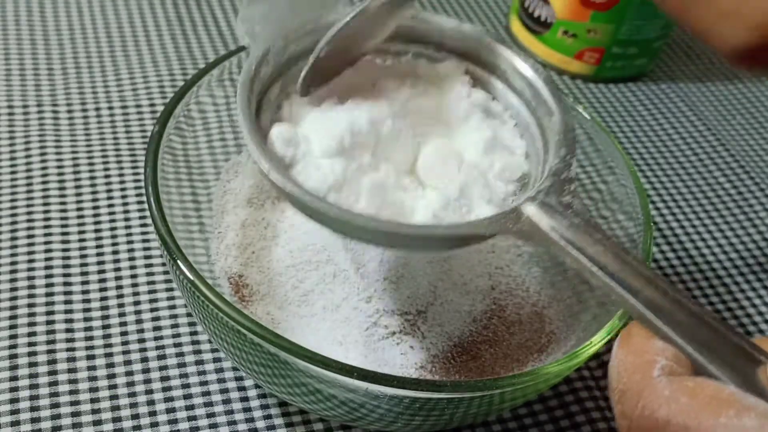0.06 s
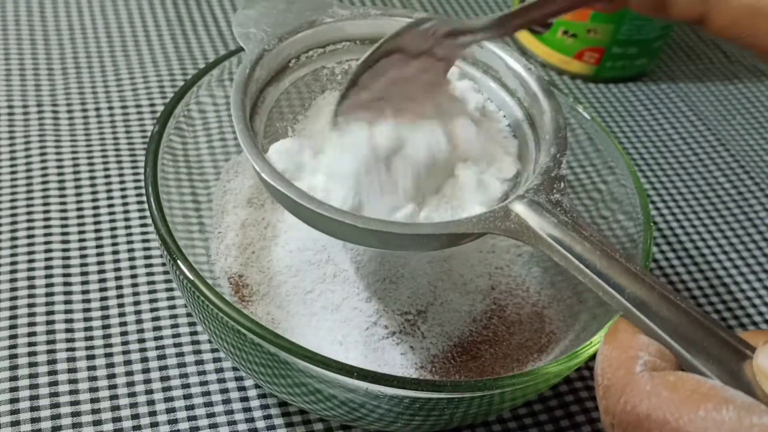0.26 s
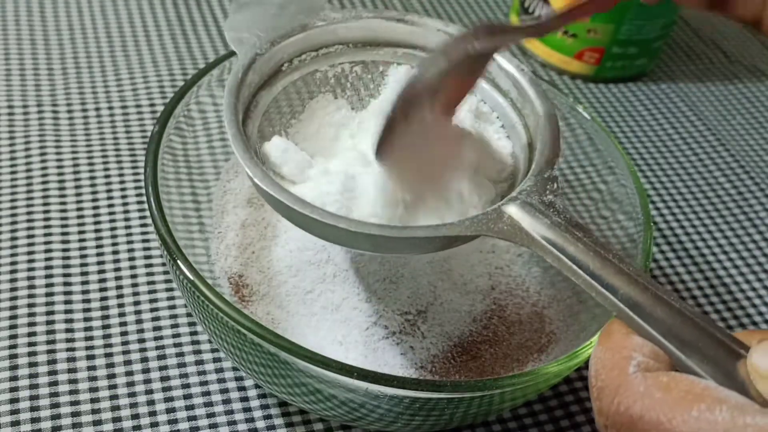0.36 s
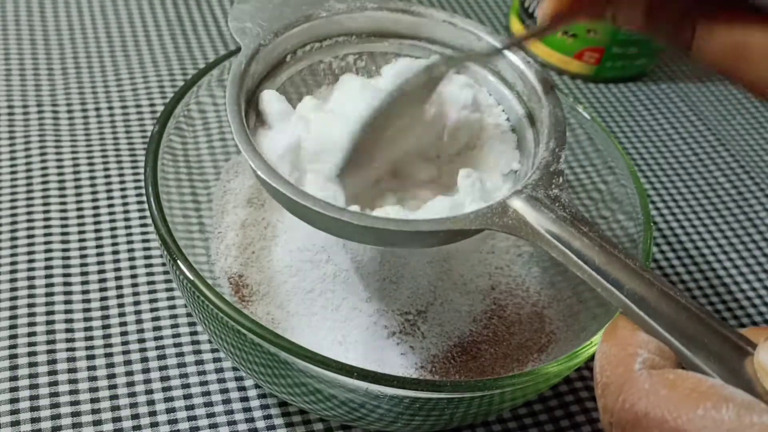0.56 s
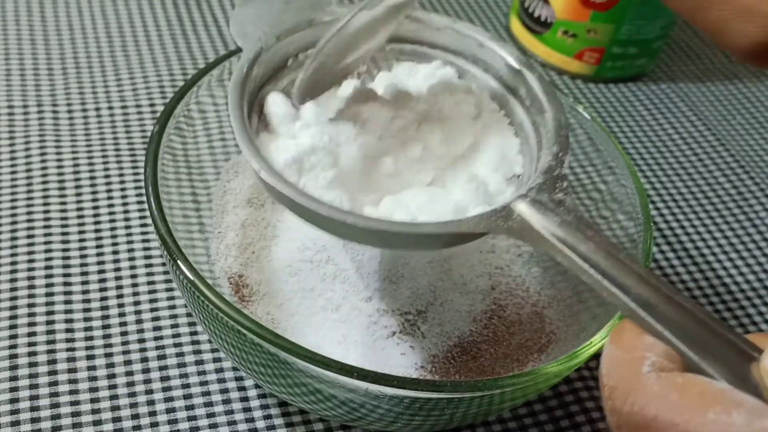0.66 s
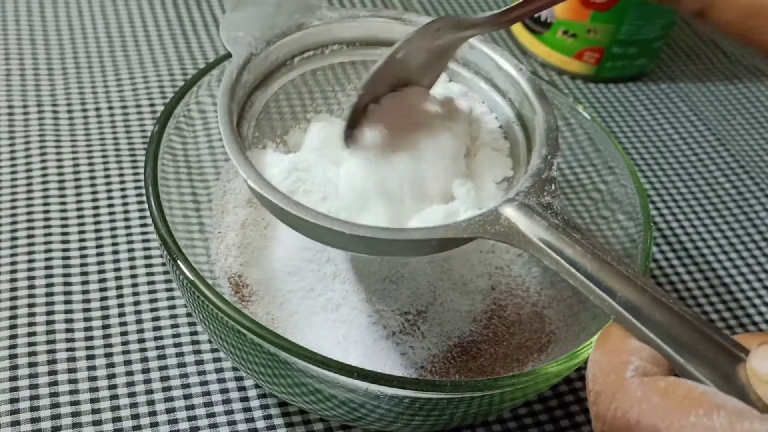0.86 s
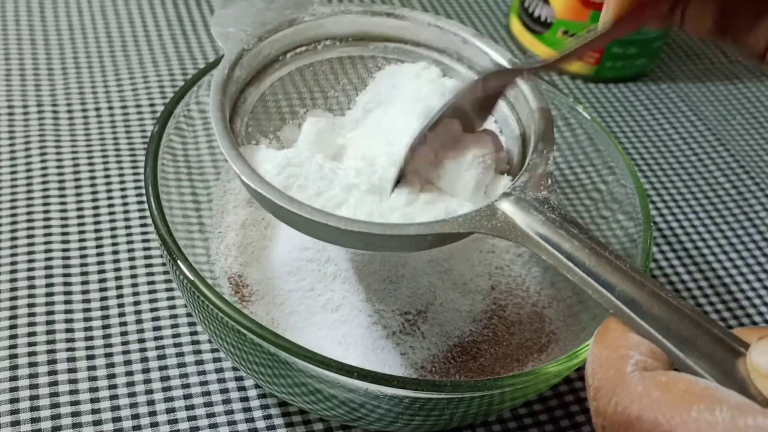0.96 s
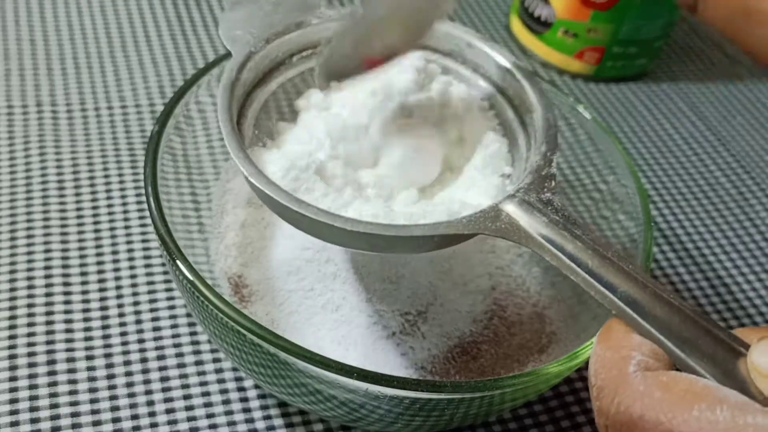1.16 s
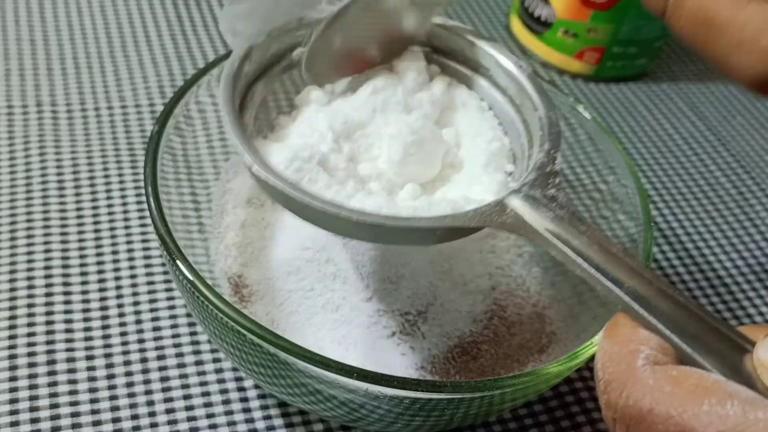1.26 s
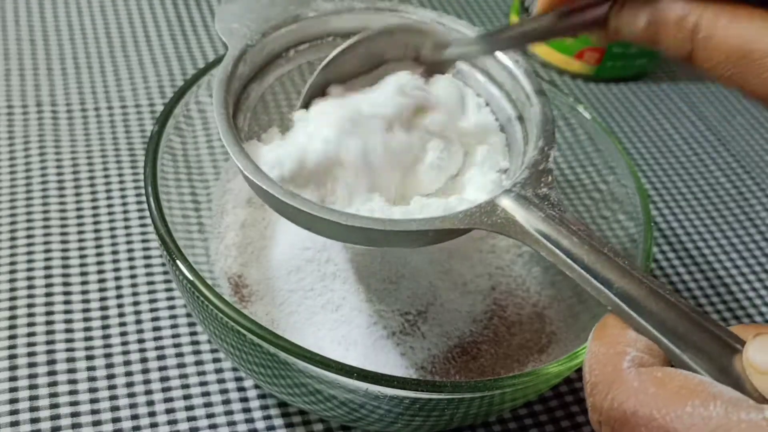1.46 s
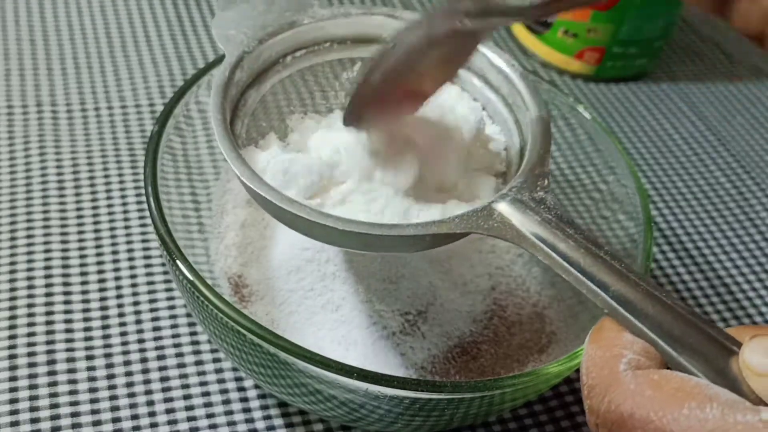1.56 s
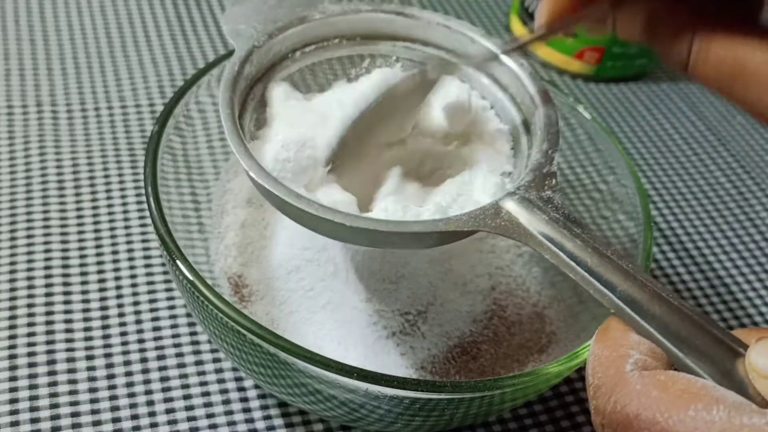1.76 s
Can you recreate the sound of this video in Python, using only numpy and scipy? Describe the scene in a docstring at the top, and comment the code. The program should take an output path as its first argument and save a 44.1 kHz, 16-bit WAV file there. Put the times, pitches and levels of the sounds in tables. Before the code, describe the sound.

A metal spoon scrapes powdered sugar through a wire sieve in short, harsh, uneven rasping strokes

```python
"""A steel spoon pushes powdered sugar through a wire sieve over a glass bowl in a quiet kitchen.
Random clicks make the rasp over the mesh and short noise bursts its catches; both ring through the sieve.
Shaped clicks make the crunch of packed sugar and the trickle of loose powder. Filtered noise makes the
shudder, the drumming mesh, the faint rim squeaks and the room tone; short sine pings are the knocks."""
import sys
import numpy as np
from scipy import signal
from scipy.fft import rfft, irfft
from scipy.io import wavfile

SR = 44100
rng = np.random.default_rng(int(sys.argv[2]) if len(sys.argv) > 2 else 0)


def dump(signal):
    """Clip the signal to [-1, 1] and save it as 16-bit WAV at the path in sys.argv[1]."""
    limited = np.clip(np.atleast_2d(signal).T, -1, 1)
    pcm = np.round(limited * 32767).astype(np.int16)
    wavfile.write(sys.argv[1], SR, pcm)


N = 79380  # length in samples, 1.8 s
TIME = np.arange(N) / SR  # seconds


def from_db(db):
    """Turn decibels into a gain."""
    return 10 ** (np.asarray(db) / 20)


def rms_one(x):
    """Scale a sound to an rms (average strength) of 1."""
    return x / np.sqrt(np.mean(x ** 2) + 1e-20)


def colour(x, points):
    """Give a sound the drawn spectrum shape without sounding ahead of time; white noise keeps its power."""
    size = 2 * N
    hz, db = np.transpose(points)
    bin_hz = np.arange(N + 1) * SR / size
    curve_db = np.interp(np.log(bin_hz + 1), np.log(hz), db)
    gain = rms_one(from_db(curve_db))
    # Folding the cepstrum makes the filter react only after its input (minimum phase).
    cepstrum = irfft(np.log(gain))
    cepstrum[1:N] *= 2
    cepstrum[N + 1:] = 0
    response = np.exp(rfft(cepstrum))
    return irfft(rfft(x, size) * response)[:N]


def resonance(x, hz, width_hz):
    """Let one pitch ring: a two-pole band-pass with gain 1 at its peak; a narrow one rings longer."""
    r = np.exp(-np.pi * width_hz / SR)
    top = np.array([1, 0, -1]) * (1 - r * r) / 2
    bottom = [1, -2 * r * np.cos(2 * np.pi * hz / SR), r * r]
    return signal.lfilter(top, bottom, x + 1e-18)


def ringing_noise(noise, hz, width_hz):
    """Noise passed twice through one resonance: a wavering tone with rms 1."""
    once = resonance(noise, hz, width_hz)
    return rms_one(resonance(once, hz, width_hz))


def drift(rate):
    """Random wander with rms 1, joining 2 * rate random points per second by straight lines."""
    points = rng.standard_normal(N)
    return rms_one(np.interp(TIME * rate * 2, np.arange(N), points))


def grains(per_s, spread_db):
    """Random clicks of uneven size and either sign, rms 1."""
    size_db = spread_db * np.minimum(rng.exponential(1, N), 4)
    sizes = from_db(size_db) * rng.choice([-1, 1], N)
    return rms_one(sizes * (rng.random(N) < per_s / SR))


def swells(rows):
    """Sum of bell-shaped rises and falls; half is the bell's standard deviation in seconds."""
    return sum(from_db(db) * np.exp(-.5 * ((TIME - s) / half) ** 2) for s, db, half in rows)


def stroke_gain(axis):
    """Strength of all strokes over time, read from one table column."""
    # one list per stroke, points joined by straight lines in dB: time_s, rasp_db, crunch_db
    # (both levels before small fixed boosts and filters)
    stroke_curves = [
        [(0, -60.5, -65), (.055, -58.5, -67), (.075, -84, -99), (.1, -88, -88)],
        [(.208, -66, -89), (.214, -54.5, -68), (.26, -44, -51.5), (.275, -35.5, -62), (.305, -40, -45.5),
         (.335, -47.5, -52.5), (.375, -81, -73.5)],
        [(.56, -65.5, -83), (.59, -58, -83), (.605, -45.5, -64), (.64, -39, -56.5), (.682, -50.5, -53),
         (.695, -68.5, -63.5), (.76, -74, -76), (.79, -90, -88)],
        [(.848, -78.5, -78), (.853, -55, -64), (.868, -55, -67.5), (.876, -37.5, -51.5), (.925, -39, -43),
         (.94, -46.5, -54.5), (.968, -52.5, -57.5), (.985, -67, -66), (1.02, -70, -71), (1.1, -74, -72),
         (1.19, -80, -78)],
        [(1.2, -43, -75), (1.21, -42, -57), (1.237, -42.5, -63), (1.246, -52, -57.5), (1.31, -64.5, -66),
         (1.33, -74, -88)],
        [(1.416, -45, -47.5), (1.45, -40.5, -56), (1.464, -50, -54), (1.5, -37, -50), (1.542, -41, -52.5),
         (1.55, -71, -52.5), (1.57, -67, -57.5), (1.585, -84, -86)],
        [(1.785, -74, -77), (1.793, -57, -77), (1.8, -44.5, -74)],
    ]
    total = 0
    for rows in stroke_curves:
        points = np.array(rows)
        level_db = np.interp(TIME, points[:, 0], points[:, axis], left=-120, right=-120)
        total = total + from_db(level_db)
    return total


def background():
    """Low room tone from coloured noise, with a faint wavering hum from narrow resonances."""
    # faint hum tones: pitch_hz, level_db
    hum_tones = [(338, -77.5), (415, -83)]
    # spectrum shape of the room tone: pitch_hz, relative_db_per_hz
    room_tone_shape = [(25, -16.5), (45, -7), (100, 2), (165, 1), (225, -4.5), (340, -2), (430, -3),
                       (490, -7.5), (610, -6), (900, -17.5), (3000, -22.5), (8000, -27.5), (15000, -32.5)]
    width_hz, room_tone_db = 5.6, -70
    hum = sum(from_db(db) * ringing_noise(rng.standard_normal(N), hz, width_hz) for hz, db in hum_tones)
    return hum + from_db(room_tone_db) * colour(rng.standard_normal(N), room_tone_shape)


def kitchen(x):
    """Sound scattered by the room: a short tail of fading noise."""
    t60_s, tail_db = 0.16, -16  # t60: time to fall by 60 dB
    tail = rng.standard_normal(N) * from_db(-60 * TIME / t60_s) * (TIME > .004)
    tail = tail / np.sqrt(np.sum(tail ** 2))
    return from_db(tail_db) * signal.fftconvolve(x, tail)[:N]


def rim_squeaks():
    """The spoon rubs on the rim: friction noise excites a faint, wavering pitch."""
    # rubs on the rim: middle_s, level_db, half_length_s, pitch_hz
    rim_rubs = [(0.83, -73, 0.0089, 2910), (0.846, -74, .005, 3550), (.975, -62, .004, 2700),
                (1.04, -67, .045, 2980), (1.183, -74.5, 0.041, 2860), (1.321, -68, .005, 2970),
                (1.342, -76, 0.044, 2910)]
    width_hz = 340
    friction = rng.standard_normal(N)
    return sum(swells([(s, db, half)]) * ringing_noise(friction, hz, width_hz)
               for s, db, half, hz in rim_rubs)


def knocks():
    """The spoon's edge strikes bare steel: sine pings with a soft start that die away quickly."""
    # knocks: start_s, level_db (before the soft start), pitch_hz, t60_s (time to fall by 60 dB)
    steel_knocks = [(0.6317, -9, 2200, 0.0014), (1.2015, -11.5, 5400, .004), (1.4164, -25.5, 3027, 0.016),
                    (1.4843, -21, 7400, 0.0064), (1.708, -57.5, 7490, 0.028)]
    rise_s = 0.00047
    out = np.zeros(N)
    for s, db, hz, t60 in steel_knocks:
        age = np.maximum(TIME - s, 0)
        decay = from_db(db - 60 * np.minimum(age / t60, 2))
        rise = 1 - np.exp(-age / rise_s)
        out += decay * rise * np.sin(2 * np.pi * hz * age)
    return out


def shudder():
    """Each push shakes the sieve: low coloured noise swells and fades."""
    # pushes: middle_s, level_db, half_length_s
    push_swells = [(.02, -63, 0.04), (.25, -62, 0.017), (.32, -56, 0.032), (.645, -57.5, .04),
                   (.955, -58, 0.027), (1.27, -65, 0.027), (1.52, -56.5, 0.042)]
    # spectrum shape of the shaking: pitch_hz, relative_db_per_hz
    shaking_shape = [(25, -29), (45, -12.5), (65, -2), (100, -1.5), (160, -1), (260, -7), (500, -26)]
    return swells(push_swells) * colour(rng.standard_normal(N), shaking_shape)


def dome():
    """The stretched mesh drums under a hard push: noise rings at one low pitch."""
    # drumming: middle_s, level_db, half_length_s
    drum_swells = [(.302, -50.5, 0.022), (.928, -49, 0.0087), (.95, -63, 0.018)]
    return swells(drum_swells) * ringing_noise(rng.standard_normal(N), hz=688, width_hz=90)


def trickle():
    """Loose powder falls through the mesh: a dense rain of tiny, uneven clicks."""
    # trickles: middle_s, level_db, half_length_s
    trickle_swells = [(.45, -70, 0.055), (.74, -77.5, 0.033), (1.085, -63, 0.025), (1.145, -58, .016),
                      (1.185, -55, 0.011), (1.67, -73.5, 0.045)]
    # spectrum shape of the powder: pitch_hz, relative_db_per_hz
    powder_shape = [(800, -10.5), (2000, -9), (4600, -6), (6500, -6.5), (8100, 1.5), (9400, -5),
                    (10600, -12), (12400, -10), (13600, 1), (14500, -4.5), (15400, -6.5)]
    return swells(trickle_swells) * colour(grains(per_s=34000, spread_db=8.0), powder_shape)


def crunch():
    """Packed sugar breaks under the spoon: random crumb clicks with a dull colour."""
    # spectrum shape of the crunch: pitch_hz, relative_db_per_hz
    crunch_shape = [(100, -12), (200, -11.5), (330, 0.5), (480, -6.5), (690, -2.5), (840, -13.5),
                    (1500, -12), (3000, -16)]
    boost_db = 1
    crumbs = colour(grains(per_s=2000, spread_db=1.5), crunch_shape)
    return from_db(boost_db) * stroke_gain(axis=2) * crumbs


def catches():
    """The spoon snags and lets go: a sudden burst of wire chatter rings and dies in milliseconds."""
    # catches: start_s, level_db (before trim_db and the sieve), hold_s (before the decay),
    # ring_hz (of that spot), ring_boost_db, boost_above_11_khz_db
    mesh_catches = [(0.2308, -43, .001, 8300, 15, 8), (0.2405, -44, 0.0024, 8200, 5, 0),
                    (.2652, -31.5, .0035, 2900, 3.5, -13), (.2688, -35, 0.0018, 8100, 7, -3),
                    (0.2853, -30, 0.0028, 8230, 7, 7), (.291, -30, 0.0033, 8160, 11.5, -17),
                    (0.603, -44.5, 0.0017, 7460, 8, 16.5), (0.622, -28, 0.0038, 7100, 2, -4),
                    (0.6311, -26, 0.0032, 3150, 5, 2.5), (0.6502, -32, 0.0014, 7600, -7, -17),
                    (0.8707, -30, 0.0068, 3420, -0.5, 6), (0.886, -35.5, 0.0027, 2530, 8.5, 5),
                    (0.904, -36, 0.0044, 8100, 7.5, 8), (0.9243, -33.5, 0.0042, 8400, 9, 8),
                    (1.2013, -24, 0.0024, 4730, 8, -2.5), (1.4161, -29, 0.0032, 8200, 3, -0.5),
                    (1.45, -38.5, 0.0012, 7730, 12.5, 0), (1.483, -26.5, 0.0014, 4000, 1, -10),
                    (1.4967, -35, 0.0026, 8100, 1, 4), (1.531, -30.5, 0.0017, 6270, 6, -15),
                    (1.5361, -30, 0.0028, 8200, 5, -11), (1.544, -34.5, 0.00093, 7860, 10, -8),
                    (1.71, -58, 0.0012, 11500, 10, 6)]
    decay_s, trim_db, tremble_db = 0.0013, -1, 2.5
    ring_width_hz = 830
    chatter = rng.choice([-1., 1.], N) * from_db(trim_db + tremble_db * drift(700))
    high_pass = signal.butter(3, 11000, "high", fs=SR, output="sos")
    high = signal.sosfiltfilt(high_pass, chatter)
    out = np.zeros(N)
    for s, db, hold, ring_hz, ring_db, high_db in mesh_catches:
        fade = np.exp(-np.maximum(TIME - s - hold, 0) / decay_s)
        envelope = from_db(db) * (TIME >= s) * fade
        burst = envelope * (chatter + (from_db(high_db) - 1) * high)
        out += burst + (from_db(ring_db) - 1) * resonance(burst, ring_hz, ring_width_hz)
    return out


def rasp():
    """Thousands of tiny slips over the wires, in an uneven judder, coloured by where the spoon presses."""
    # favoured parts of the mesh: middle_s, half_length_s, pitch_hz, width_hz, added_level_db
    mesh_spots = [(.29, 0.037, 2460, 700, -8), (0.64, 0.037, 4950, 3500, -10),
                  (.9, 0.031, 2140, 1000, -0.5), (.9, .04, 14700, 2000, -3), (1.25, 0.17, 4380, 2500, 0.5),
                  (1.52, 0.028, 7200, 1300, -4), (1.8, .03, 13900, 3060, 9.5)]
    boost_db, judder_db, judder_per_s = 0.5, 2, 170
    judder = from_db(boost_db + judder_db * drift(judder_per_s))
    slips = stroke_gain(axis=1) * judder * grains(per_s=9000, spread_db=2.5)
    spots = sum(swells([(s, db, half)]) * resonance(slips, hz, width)
                for s, half, hz, width, db in mesh_spots)
    return slips + spots


def sieve(force):
    """The mesh turns the spoon's force into a broad rasp with its resonances standing out."""
    # resonances of the sieve: pitch_hz, width_hz, added_level_db (before the broad colour)
    sieve_modes = [(668, 28, 1.5), (1927, 27, 1.5), (2385, 122, 5), (2620, 210, -1), (3014, 70, 6),
                   (3290, 70, 5), (4346, 33, -3), (5454, 130, -3.5), (6950, 83, 0), (7937, 102, 6.5),
                   (8160, 39, 3.5), (8270, 79, 4), (9610, 170, -2), (13700, 80, -8.5), (13400, 100, 8),
                   (15950, 330, 9)]
    # broad colour of the rasp: pitch_hz, relative_db_per_hz
    rasp_shape = [(200, -13.5), (600, -6), (1100, -11.5), (1800, -10), (2600, -7), (3800, -6), (6000, -4),
                  (8200, -2), (9400, -2), (10400, -13), (11500, -6), (12300, -13), (13500, -6),
                  (15400, -2.5)]
    modes = sum(from_db(db) * resonance(force, hz, width) for hz, width, db in sieve_modes)
    return from_db(-3.5) * colour(force + modes, rasp_shape)


def scene():
    """Sieve, sugar and spoon, with their room tail, over the background."""
    mesh = sieve(rasp() + catches())
    sugar = crunch() + trickle()
    rim = rim_squeaks() + knocks()
    near = mesh + sugar + rim + shudder() + dome()
    return (near + kitchen(near) + background())[None]


def record(dry):
    """Cut the treble steeply above 15.5 kHz."""
    low_pass = signal.ellip(10, .3, 80, 15500, fs=SR, output="sos")  # .3 dB ripple, 80 dB cut
    return signal.sosfilt(low_pass, dry)


dry = scene()
out = record(dry)
dump(out)
```